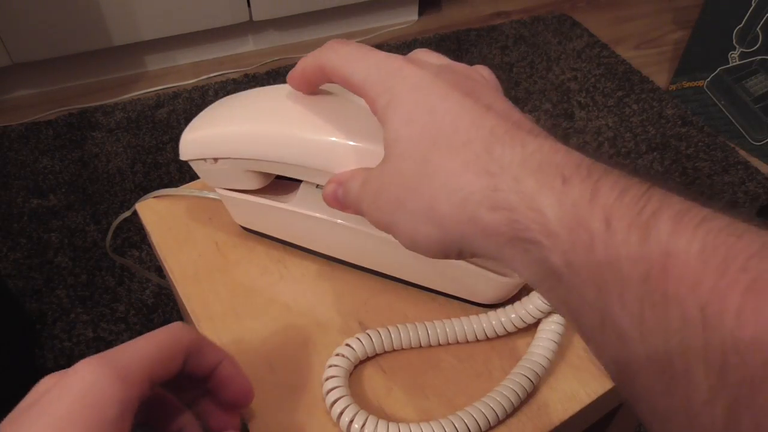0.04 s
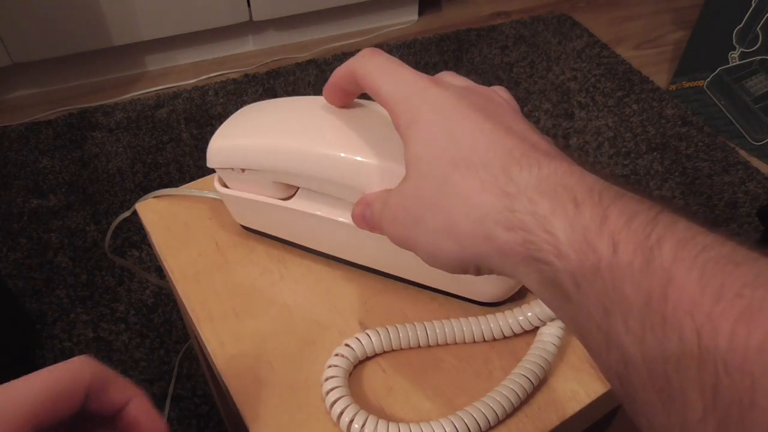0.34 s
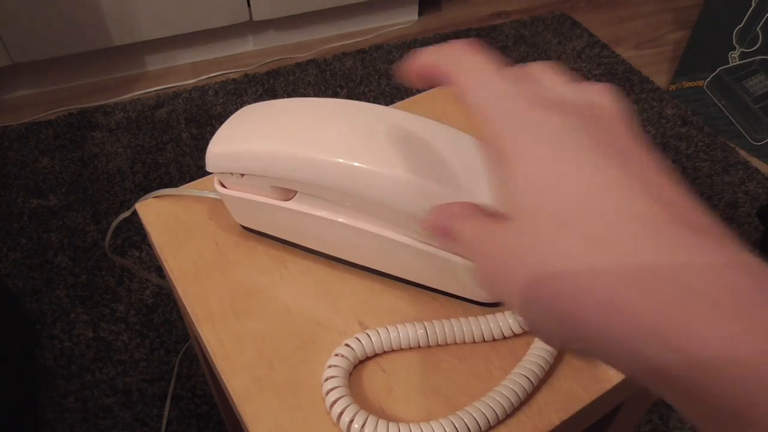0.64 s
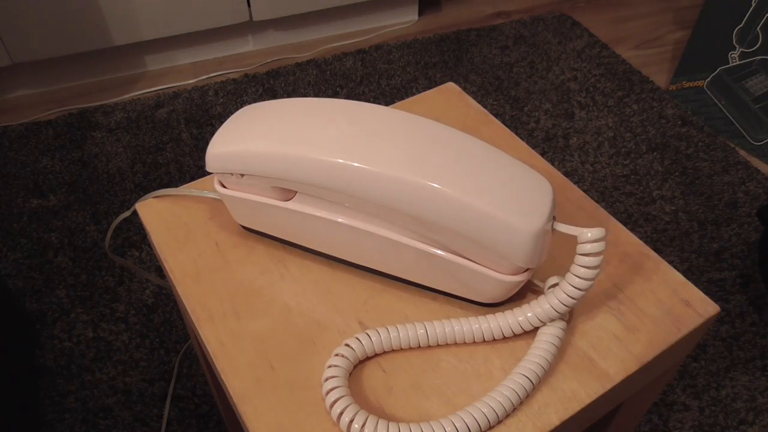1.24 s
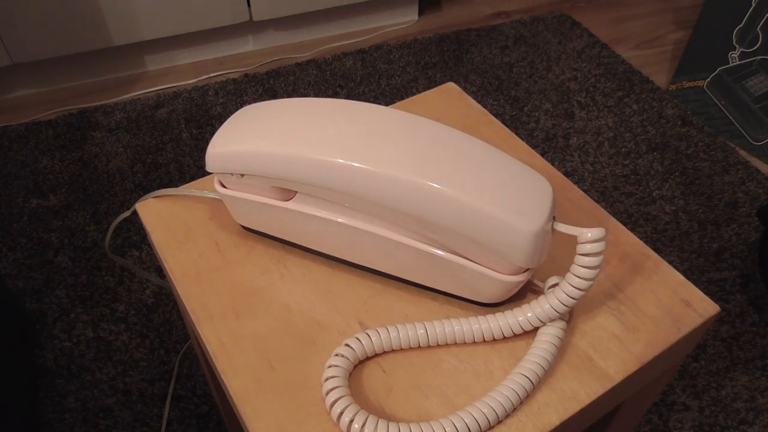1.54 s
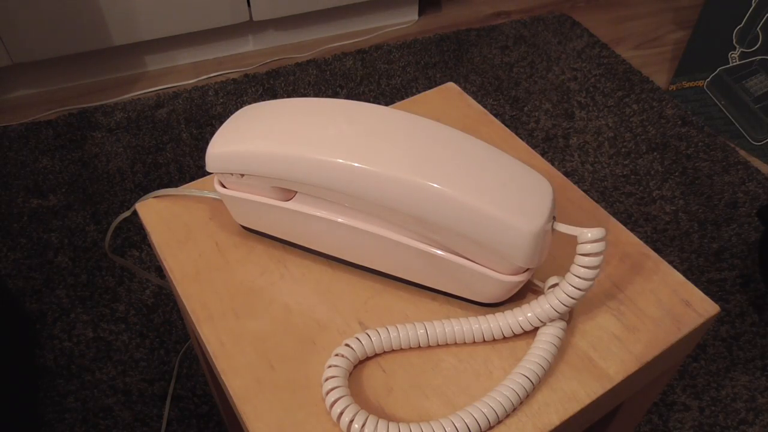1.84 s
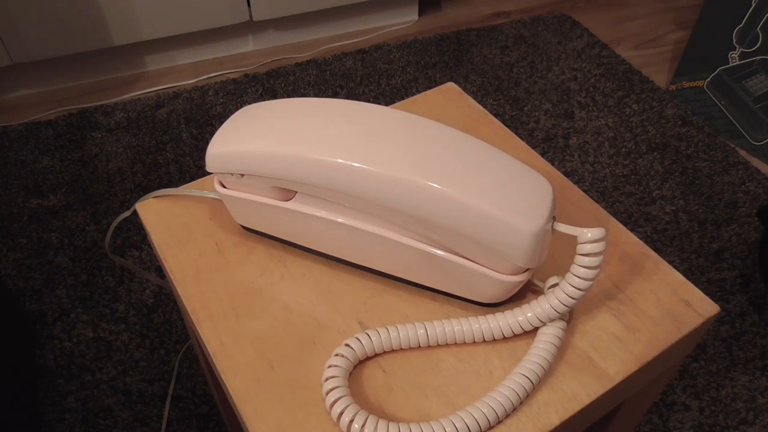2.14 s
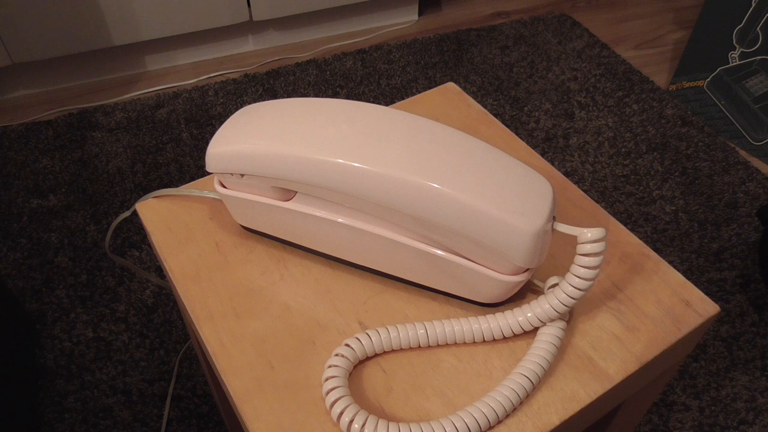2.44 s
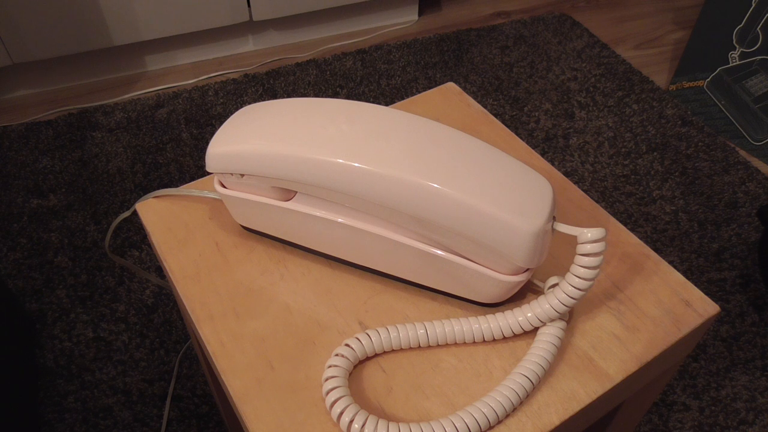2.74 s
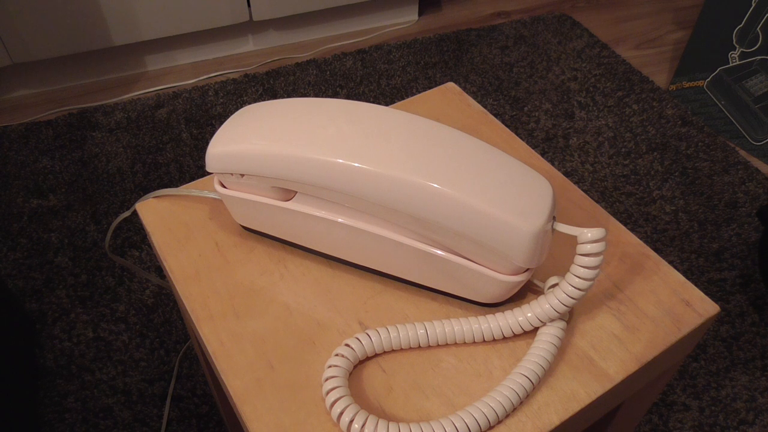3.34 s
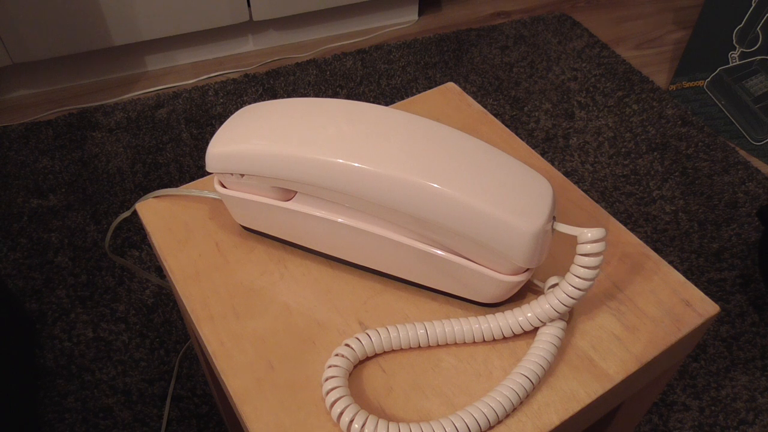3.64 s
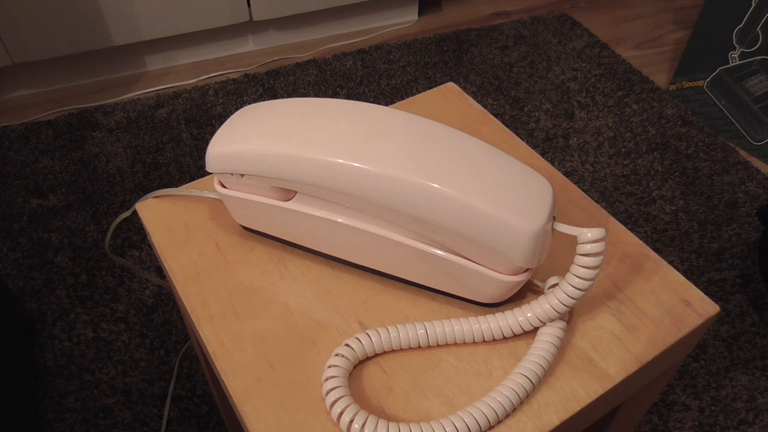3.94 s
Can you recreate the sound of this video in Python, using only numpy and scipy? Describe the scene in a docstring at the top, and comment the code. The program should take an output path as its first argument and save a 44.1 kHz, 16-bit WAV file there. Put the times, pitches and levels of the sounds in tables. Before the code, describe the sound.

A telephone is hung up close to the microphone: one hollow plastic clack, a cluster of sharper clicks as the handset seats, then two softer knocks. The small carpeted room is left with faint hum and hiss.

```python
"""Hanging up a telephone

A plastic handset knocks onto its base on a wooden table, slides and snaps into the cradle, rocks to rest.
Each contact rings the hollow base, the table and the plastic shell under a sharp crack; hard blows
set a small metal part ringing faintly. A small carpeted room answers. Low hum and hiss run
throughout; a few faint handling ticks follow."""
import sys
import numpy as np
from scipy import signal
from scipy.fft import rfft, irfft, next_fast_len
from scipy.io import wavfile
from scipy.ndimage import uniform_filter1d

SR = 44100
rng = np.random.default_rng(int(sys.argv[2]) if len(sys.argv) > 2 else 0)


def dump_mix(stems):
    """Bounce the given channels to the path in sys.argv[1] as a 16-bit WAV at rate SR."""
    frames = np.atleast_2d(stems).T  # one column per channel
    limited = np.clip(frames, -1, 1)  # hard clip at full scale
    pcm = np.round(limited * 32767).astype(np.int16)
    wavfile.write(sys.argv[1], SR, pcm)


N = 176400

# Room noise spectrum. Each row: frequency in Hz, relative level in dB.
AIR_COLOUR = [(25, -30.5), (40, -28), (65, -26), (85, -12), (125, -10.5), (170, -6), (240, -6.5),
              (350, -10), (450, -13.5), (930, -20.5), (1500, -26), (2090, -27.5), (2520, -35),
              (4000, -31.5), (6300, -34), (10300, -26.5), (13000, -28.5), (15800, -32)]
# Room noise width. Each row: frequency in Hz, side over mid in dB.
AIR_WIDTH = [(60, -12), (110, -3), (200, -2.5), (380, 1.5), (700, 4.5), (1290, 3.5), (2380, -0.5),
             (4400, -1), (8120, -1), (15000, -2)]
# High hiss envelope. Each row: time in seconds, level in dB.
HISS_LEVELS = [(0, -84), (1.1, -76.5), (1.4, -69.5), (1.7, -67), (1.95, -77.5), (2.22, -68), (2.4, -78),
               (4, -88.5)]
# High hiss spectrum. Each row: frequency in Hz, relative level in dB.
HISS_COLOUR = [(3000, -26), (8000, -9.5), (10500, 1.5), (12500, -0.5), (15000, -13)]
# Handset hits the base. Each row: start in seconds, hollow pitch in Hz, hollow, shell and crack
# gains in dB, low-pass corner of shell and crack in Hz, ring length factor.
HANDSET_CONTACTS = [(.0182, 657, -8, -18.5, -15, 13000, 1.35), (.0745, 653.6, -38, -27.5, -33, 2421, 1.25),
                    (.1865, 691, -43, -42.5, -49, 1710, 3), (.2672, 619.2, -8, -4.5, -14, 13700, 0.5),
                    (.2892, 662, -16.5, -15, -24, 8048, 1.05), (.3145, 639, -30, -32.5, -35.5, 4000, .8),
                    (0.3286, 690.7, -36, -34.5, -36.5, 6976, .8),
                    (.3348, 740, -31.5, -18.5, -20.5, 8000, .9),
                    (.3500, 586.6, -20.5, -19, -11.5, 15000, 1.3),
                    (.3598, 629, -18.5, -19.5, -24.5, 6000, .8), (.3648, 602, -11.5, -26, -26, 11000, .9),
                    (.3885, 615, -35.5, -30, -48.5, 5000, 1), (.4465, 622, -25, -52, -45, 2000, 1),
                    (.521, 610, -39.5, -76, -64, 1930, 1.3), (.5978, 645, -26.5, -32.5, -38.5, 2970, 1.04),
                    (.6500, 638, -18.5, -28.5, -39, 4440, .9)]
# Wooden table modes. Each row: frequency in Hz, level against the hollow in dB, T60 in seconds.
TABLE_MODES = [(116.23, -36, 0.19), (180, -31.5, .11), (235, -32, 0.15)]
# Contact crack spectrum. Each row: frequency in Hz, relative level in dB.
CRACK_COLOUR = [(100, -19.5), (300, -9.5), (600, -1), (1400, 4.5), (2100, -2.5), (3100, -3), (4500, 0),
                (6500, -6.5), (10000, -1), (13000, -10.5), (16000, -12.5)]
# Plastic shell modes. Each row: frequency in Hz, relative level in dB.
SHELL_MODES = [(430, -14), (545, -7.5), (790, -5), (950, -8.5), (1050, -14), (1260, -9), (1385, -8.5),
               (1580, -15), (1960, -18.5), (2580, -21.5), (3400, -23), (4420, -16)]
# Room tail decay. Each row: frequency in Hz, T60 in seconds.
TAIL_DECAY = [(150, .33), (600, .25), (1500, .26), (4500, .25), (10000, .18), (15000, .14)]
# Room tail spectrum. Each row: frequency in Hz, gain in dB.
TAIL_COLOUR = [(150, -0.5), (600, -7), (1200, -5.5), (3000, -10), (6000, -12), (12000, -18)]
# Room tail width. Each row: frequency in Hz, side over mid in dB.
TAIL_WIDTH = [(150, -3.5), (600, -9), (1100, -2), (2500, -7), (10000, 1.5)]
# Blows that ring the metal part. Each row: start in seconds, level in dB.
METAL_PINGS = [(0.021, -59), (.35, -56.5)]
# Handset edge seating. Each row: start in seconds, gain in dB.
CRADLE_SNAPS = [(0.3351, -26), (0.35, -21.5)]
# Snap spectrum. Each row: frequency in Hz, relative level in dB.
SNAP_COLOUR = [(1500, -29.5), (2500, -5), (3100, 4.5), (3800, -9.5), (5000, -13), (7500, -11), (10000, -8),
               (14000, -19)]
# Handling ticks. Each row: start in seconds, gain in dB, lower and upper band edges in Hz.
HANDLING_TICKS = [(.943, -50, 199.4, 948), (1.071, -50, 5960, 12080), (1.085, -46.5, 1204, 3780),
                  (1.18, -51.5, 99.9, 450), (1.351, -47, 298, 800), (2.063, -49, 596, 2290),
                  (2.078, -51.5, 503, 2305), (2.262, -51.5, 400, 1600), (3.05, -54.5, 700, 1197),
                  (3.556, -51.5, 450, 1296), (3.795, -51.5, 349, 1102)]
# Tick spectrum before band limiting. Each row: frequency in Hz, relative level in dB.
TICK_COLOUR = [(100, -5), (200, 2.5), (800, 2.5), (1600, -8.5), (3000, -13.5), (12000, -12)]

RING_TIME_S = np.arange(SR // 2) / SR


def amp(db):
    """Decibels to gain."""
    return 10 ** (np.asarray(db) / 20)


def unit_rms(x):
    """Scale to rms 1."""
    return x / np.sqrt(np.mean(x ** 2) + 1e-20)


def along(points, hz):
    """Interpolate (Hz, value) points on a log axis."""
    point_hz, values = np.transpose(points)
    return np.interp(np.log(hz + 1), np.log(point_hz + 1), values)


def filtered(x, response):
    """Apply a frequency response."""
    n = x.shape[-1]
    size = next_fast_len(2 * n)
    return irfft(rfft(x, size) * response(np.fft.rfftfreq(size, 1 / SR)), size)[..., :n]


def butter(x, corner_hz, kind):
    """Second-order low-pass or high-pass."""
    return signal.lfilter(*signal.butter(2, corner_hz, kind, fs=SR), x)


def noise(colour, size):
    """Coloured noise of rms 1."""
    return unit_rms(filtered(rng.standard_normal(size), lambda hz: amp(along(colour, hz))))


def fade(t60_s, t=RING_TIME_S):
    """Exponential decay, 60 dB in t60_s."""
    return np.exp(-np.log(1000) * t / t60_s)


def mode(hz, t60_s, rise_s=.00064, t=RING_TIME_S):
    """One damped resonance."""
    return np.sin(2 * np.pi * hz * t) * fade(t60_s, t) * (1 - np.exp(-t / rise_s))


def burst(colour, envelope, smooth_hz=250):
    """Noise burst, its spectrum evened out to follow the colour."""
    raw = noise(colour, len(envelope)) * envelope
    size = 2 * len(raw)
    spectrum = rfft(raw, size)
    power = np.abs(uniform_filter1d(np.abs(spectrum) ** 2, size=int(smooth_hz * size / SR)))
    target = amp(along(colour, np.fft.rfftfreq(size, 1 / SR)))
    even = irfft(spectrum * target / np.sqrt(power + 1e-12), size)[:len(raw)]
    return unit_rms(even) * np.sqrt(np.mean(raw ** 2))


def add(track, start_s, sound):
    """Mix a sound into the track."""
    part = track[..., round(start_s * SR):][..., :sound.shape[-1]]
    part += sound[..., :part.shape[-1]]


def room_tone(air_db=-64.5, hum_hz=99.8, hum_db=-67):
    """Low room noise, mains hum and a high hiss that swells a little."""
    t = np.arange(N) / SR
    mid = noise(AIR_COLOUR, N)
    side = filtered(noise(AIR_COLOUR, N), lambda hz: amp(along(AIR_WIDTH, hz)))
    hum = amp(hum_db) * np.sqrt(2) * np.sin(2 * np.pi * hum_hz * t)
    hiss_gain = amp(np.interp(t, *np.transpose(HISS_LEVELS)))
    hiss = hiss_gain * np.array([noise(HISS_COLOUR, N), noise(HISS_COLOUR, N)])
    return amp(air_db) * np.array([mid + side, mid - side]) + hum + hiss


def handset(chatter_db=-18.5):
    """Each contact rings hollow base, table and shell under a crack; a firm press shortens the ring."""
    out = np.zeros((2, N))
    thud = sum(amp(db) * mode(hz, t60_s, rise_s=2 / hz) for hz, db, t60_s in TABLE_MODES)
    crack_envelope = fade(t60_s=.007) + amp(chatter_db) * fade(t60_s=.05)
    for start_s, hollow_hz, hollow_db, shell_db, crack_db, corner_hz, length in HANDSET_CONTACTS:
        hollow = mode(hollow_hz, t60_s=.045 * length, rise_s=.0016 * length)
        crack = amp(crack_db) * burst(CRACK_COLOUR, crack_envelope)
        shell = amp(shell_db) * shell_ring(length, hollow_hz)
        clack = butter(shell + crack, corner_hz, "low")  # softer contacts lose treble
        add(out, start_s, in_room(amp(hollow_db) * (hollow + thud) + clack))
    return out


def shell_ring(length, hollow_hz, scatter_db=2.5, detune=.02):
    """Shell modes shift with each point of contact; higher ones die sooner."""
    ring = np.zeros(len(RING_TIME_S))
    for k, (hz, db) in enumerate(SHELL_MODES):
        louder, higher = rng.standard_normal(2)
        t60_s = length * .034 * (1000 / hz) ** .3
        sign = (-1) ** (k + (hz > hollow_hz))  # neighbouring modes, hollow included, swing in opposition
        ring += sign * amp(db + scatter_db * louder) * mode(hz * (1 + detune * higher), t60_s)
    return ring


def in_room(x, pan_db=-.6, wall_delay_s=.014, wall_db=-14.5, wall_corner_hz=2860, tail_delay_s=.0034):
    """Direct sound just off centre, a dull wall echo and a stereo tail whose treble dies first."""
    hz, t, bands = signal.stft(rng.standard_normal((2, len(RING_TIME_S))), SR, nperseg=256)
    t60_s = along(TAIL_DECAY, hz)[:, None]
    gain = amp(along(TAIL_COLOUR, hz))[:, None] * np.sqrt(2 * np.log(1000) / (t60_s * SR))
    bands = bands * gain * fade(t60_s, t)
    bands[1] *= amp(along(TAIL_WIDTH, hz))[:, None]
    tail = signal.istft(bands, SR, nperseg=256)[1]
    mid, side = signal.fftconvolve(x[None], tail, axes=1)
    out = x * amp([[pan_db / 2], [-pan_db / 2]])
    add(out, wall_delay_s, amp(wall_db) * butter(x, wall_corner_hz, "low"))
    add(out, tail_delay_s, np.array([mid + side, mid - side]))
    return out


def metal_ping():
    """Hard blows ring a small metal part inside; its thin tone outlasts the clacks."""
    out = np.zeros(N)
    ping = mode(hz=2315, t60_s=.65, t=np.arange(SR) / SR)
    for start_s, db in METAL_PINGS:
        add(out, start_s, amp(db) * ping)
    return out


def cradle_snaps():
    """Short bright cracks as the handset's edge seats in the cradle."""
    out = np.zeros((2, N))
    for start_s, db in CRADLE_SNAPS:
        add(out, start_s, in_room(amp(db) * burst(SNAP_COLOUR, fade(t60_s=.019))))
    return out


def handling_ticks():
    """Faint ticks and bumps after the hand lets go, each in its own band."""
    out = np.zeros((2, N))
    for start_s, db, low_hz, high_hz in HANDLING_TICKS:
        tick = butter(burst(TICK_COLOUR, fade(t60_s=.045)), low_hz, "high")
        add(out, start_s, in_room(amp(db) * butter(tick, high_hz, "low")))
    return out


def scene(right_lead_s=8e-6, low_cut_hz=55):
    """The telephone in a quiet room, slightly to the right."""
    delay_s = np.array([[.5], [-.5]]) * right_lead_s
    phone = filtered(handset() + cradle_snaps(), lambda hz: np.exp(-2j * np.pi * hz * delay_s))
    knocks = butter(phone + handling_ticks(), low_cut_hz, "high")  # small objects radiate no deep bass
    return knocks + metal_ping() + room_tone()


def record(dry):
    """Steep low-pass at the band limit."""
    top_hz = 15900
    return filtered(dry, lambda hz: 1 / np.sqrt(1 + (hz / top_hz) ** 160))


dry = scene()
out = record(dry)
dump_mix(out)
```